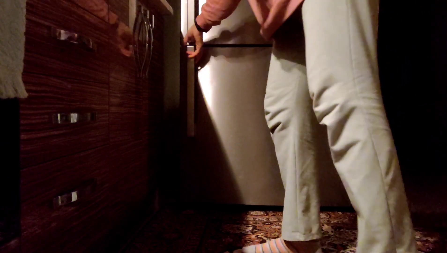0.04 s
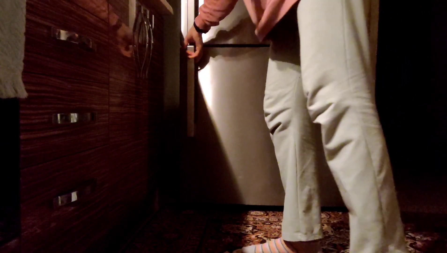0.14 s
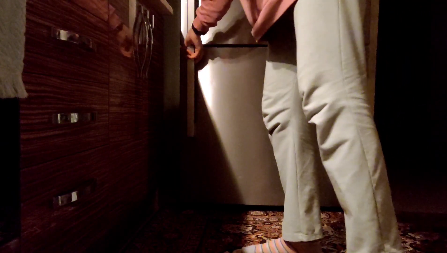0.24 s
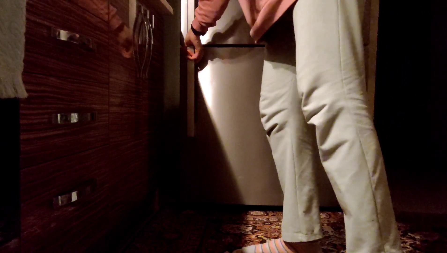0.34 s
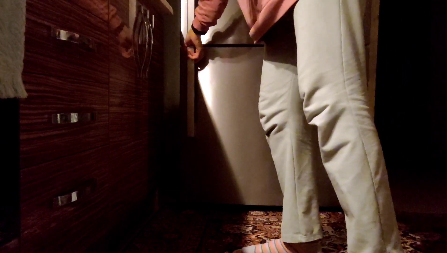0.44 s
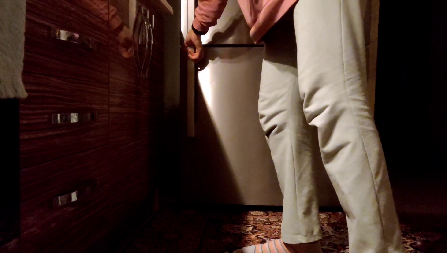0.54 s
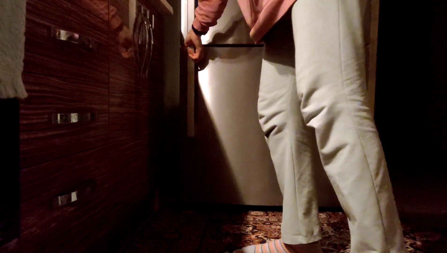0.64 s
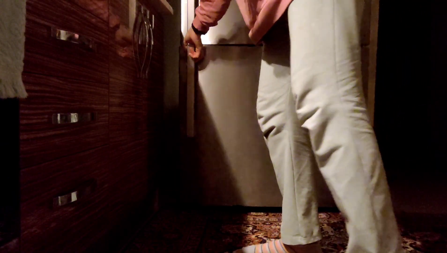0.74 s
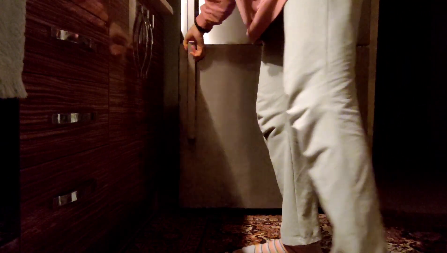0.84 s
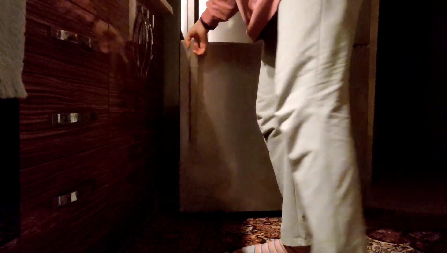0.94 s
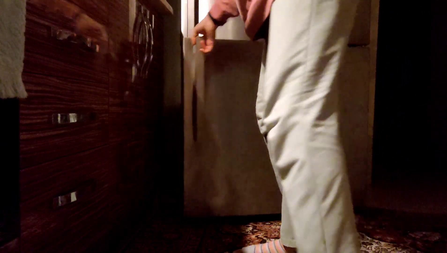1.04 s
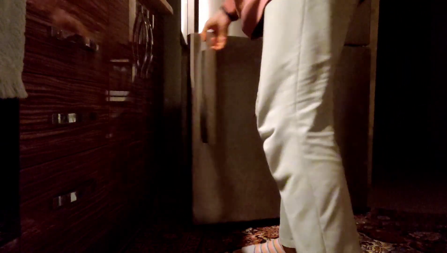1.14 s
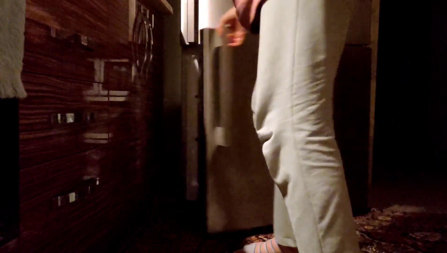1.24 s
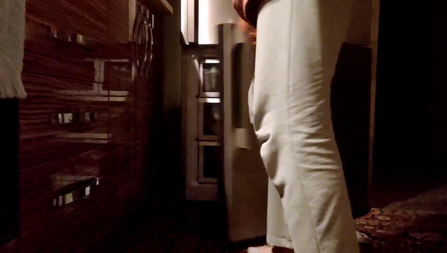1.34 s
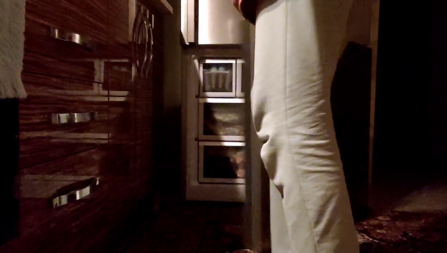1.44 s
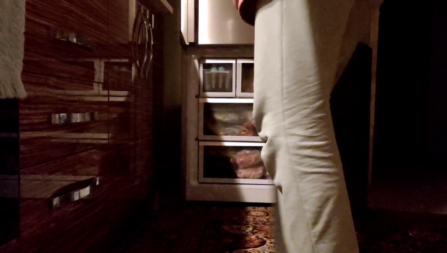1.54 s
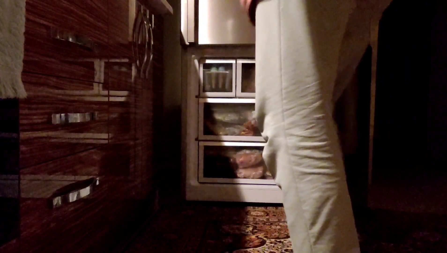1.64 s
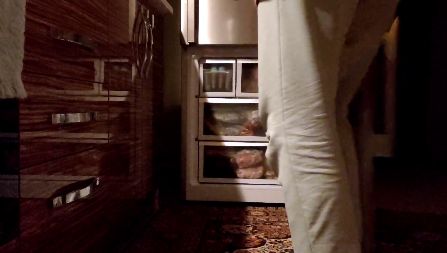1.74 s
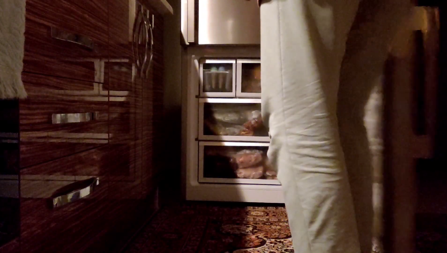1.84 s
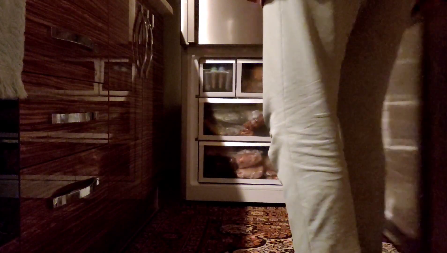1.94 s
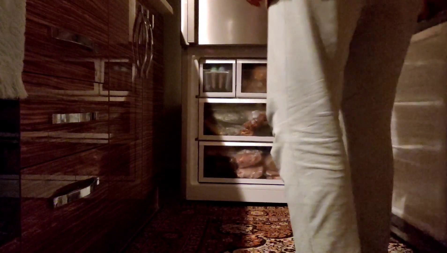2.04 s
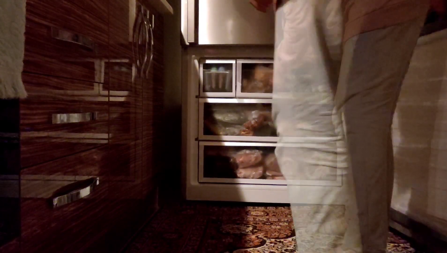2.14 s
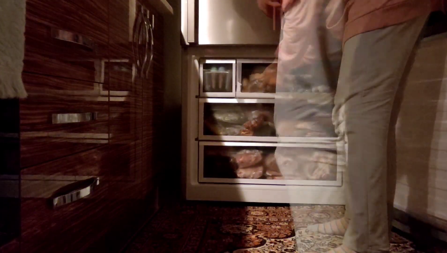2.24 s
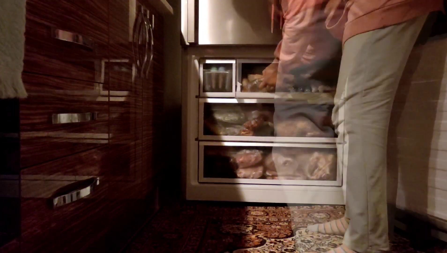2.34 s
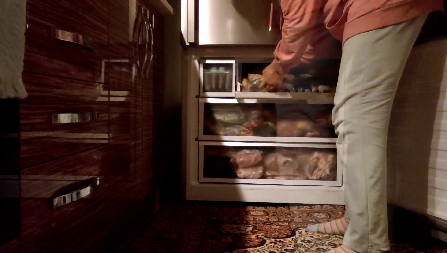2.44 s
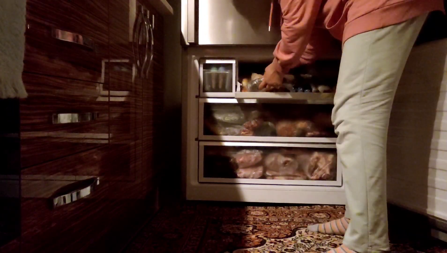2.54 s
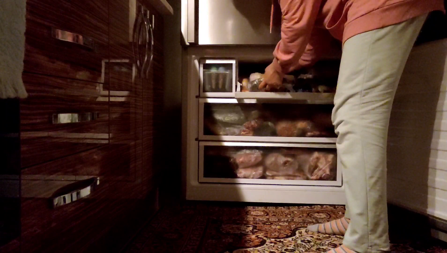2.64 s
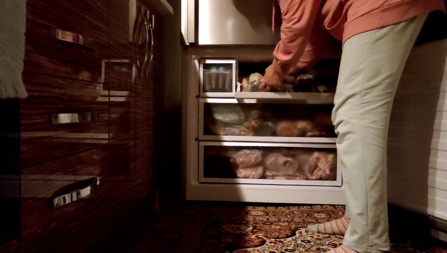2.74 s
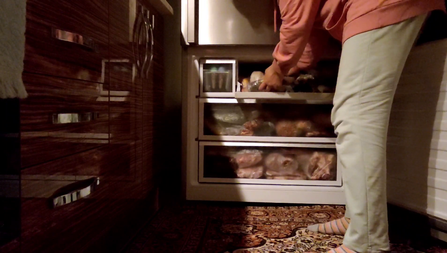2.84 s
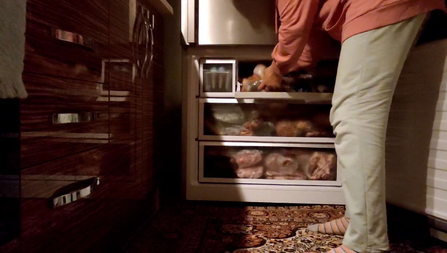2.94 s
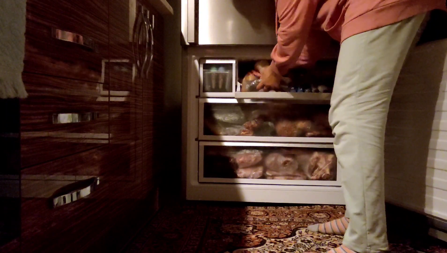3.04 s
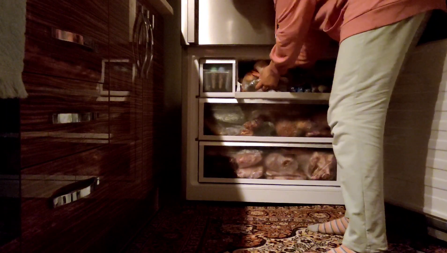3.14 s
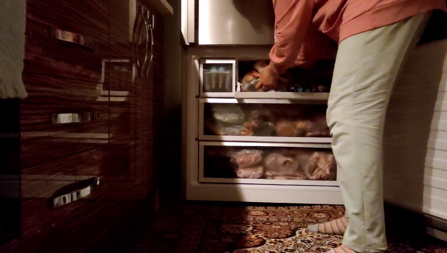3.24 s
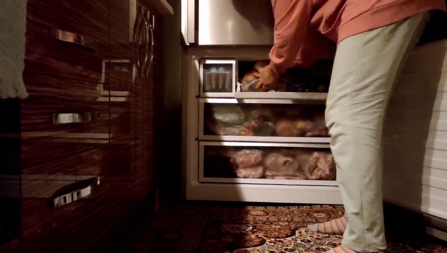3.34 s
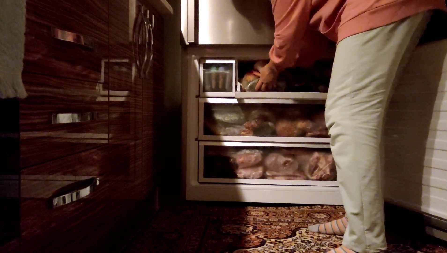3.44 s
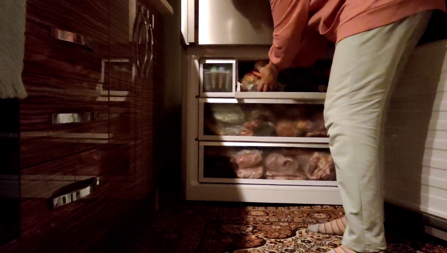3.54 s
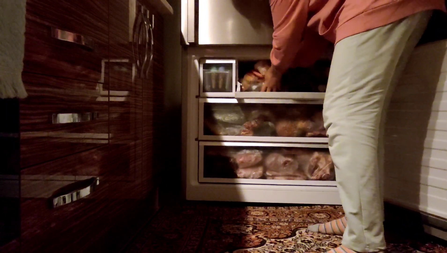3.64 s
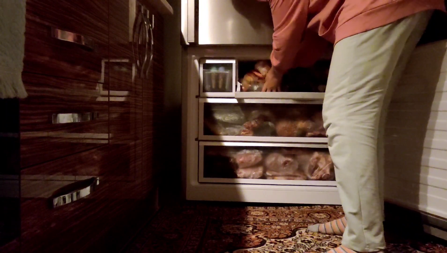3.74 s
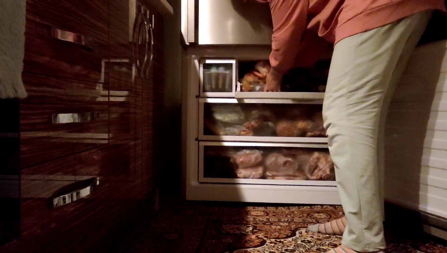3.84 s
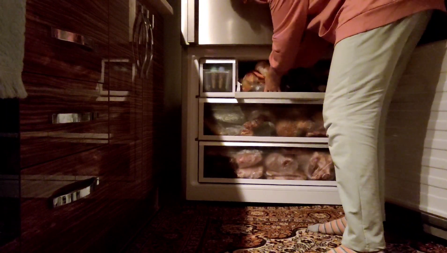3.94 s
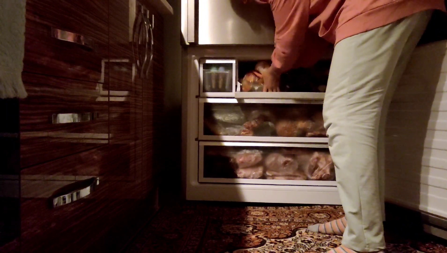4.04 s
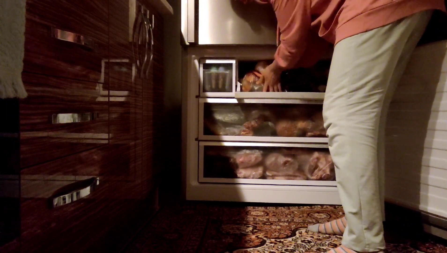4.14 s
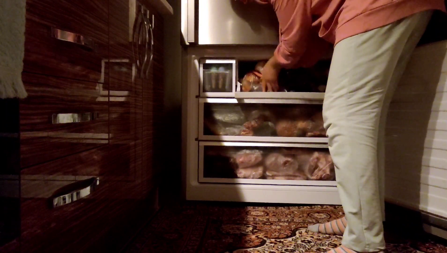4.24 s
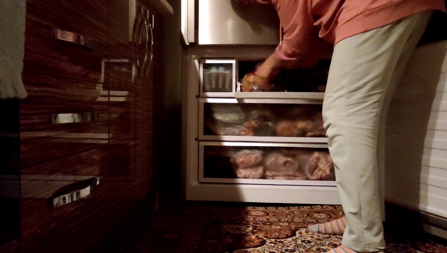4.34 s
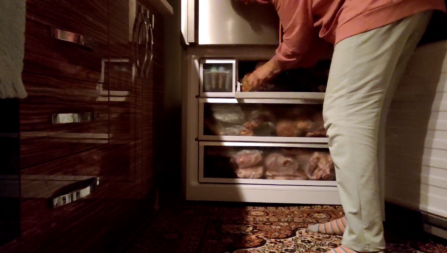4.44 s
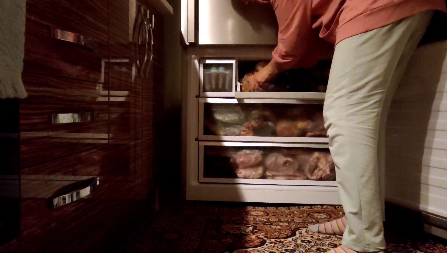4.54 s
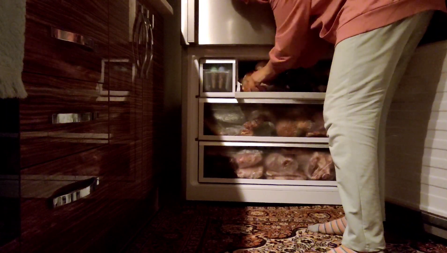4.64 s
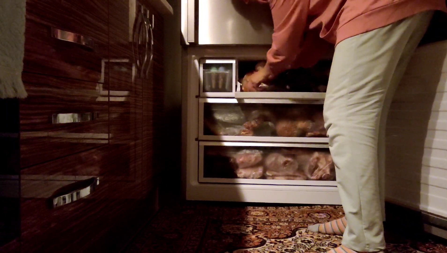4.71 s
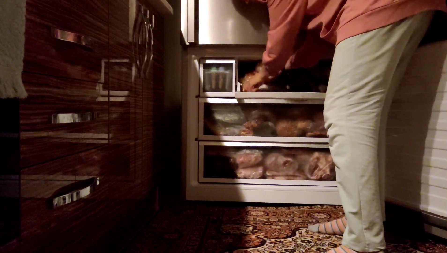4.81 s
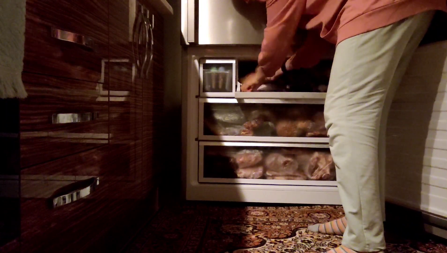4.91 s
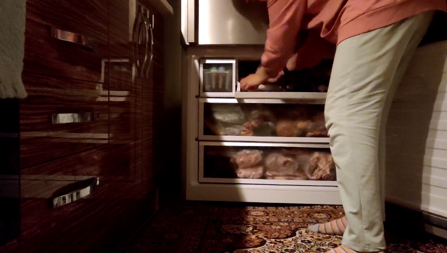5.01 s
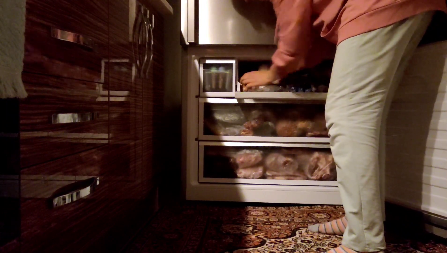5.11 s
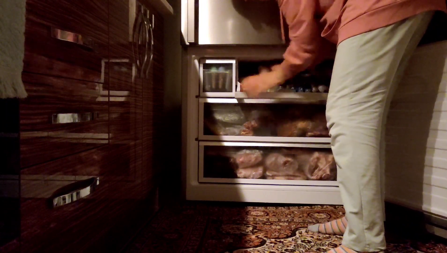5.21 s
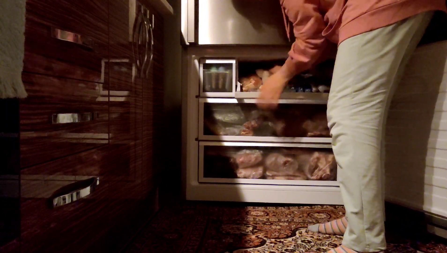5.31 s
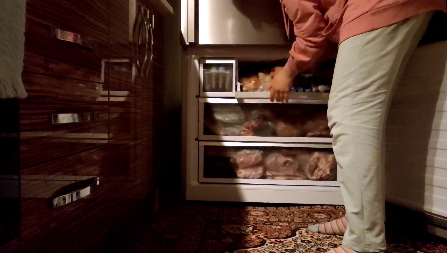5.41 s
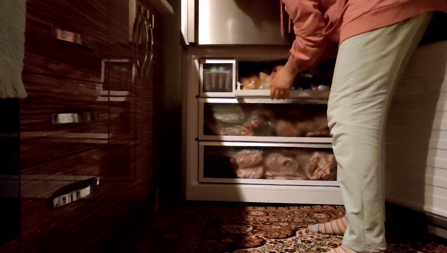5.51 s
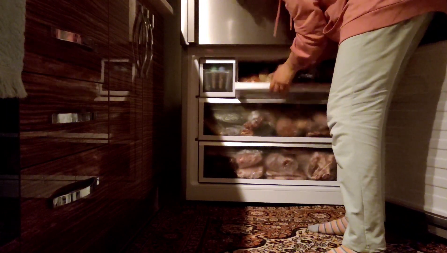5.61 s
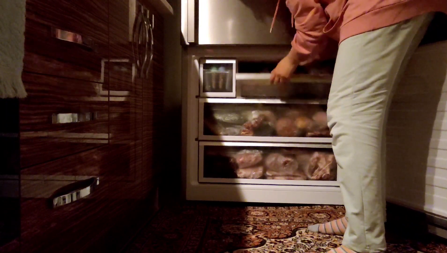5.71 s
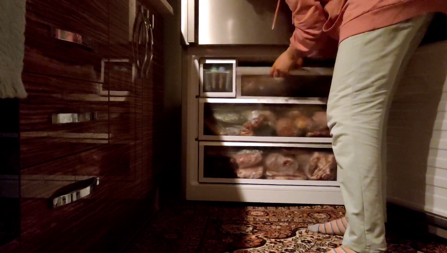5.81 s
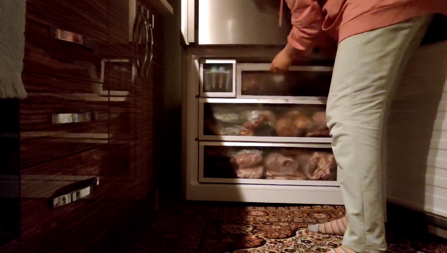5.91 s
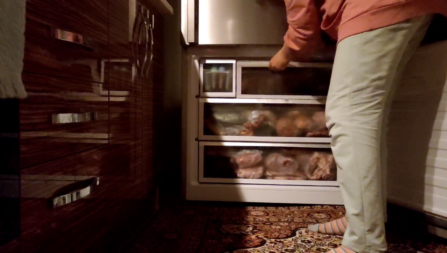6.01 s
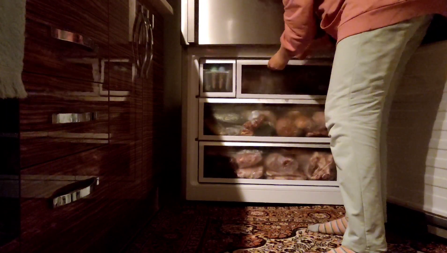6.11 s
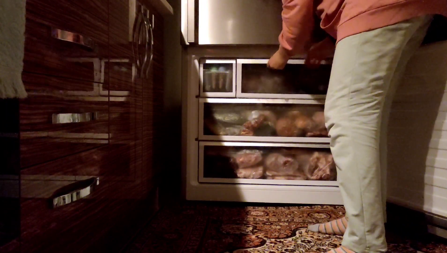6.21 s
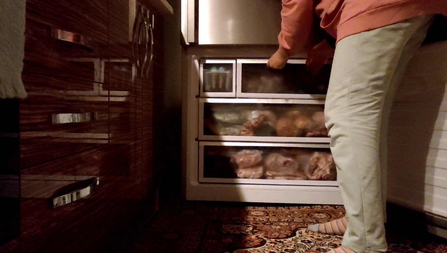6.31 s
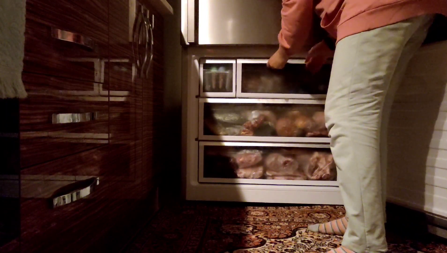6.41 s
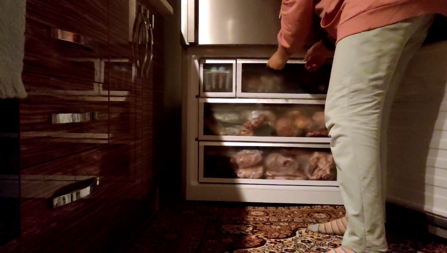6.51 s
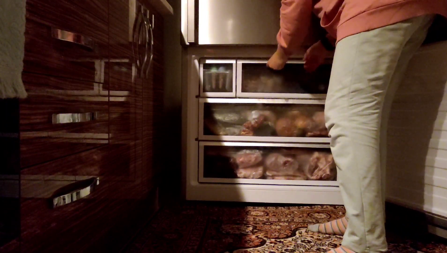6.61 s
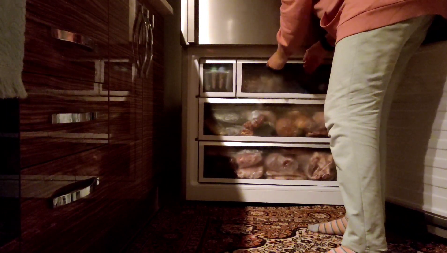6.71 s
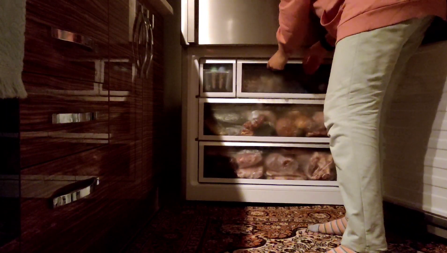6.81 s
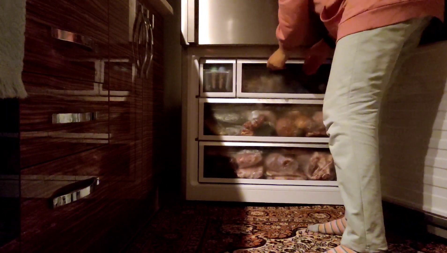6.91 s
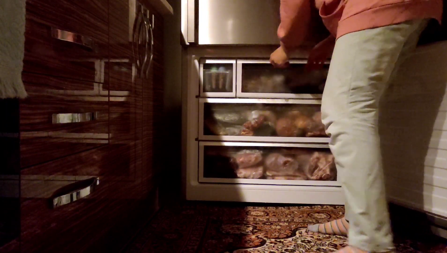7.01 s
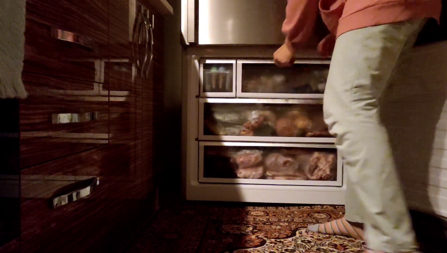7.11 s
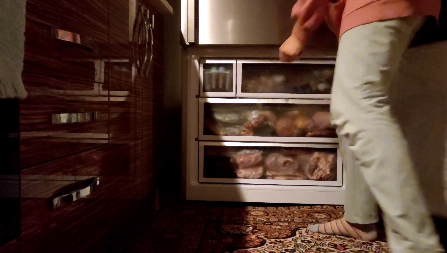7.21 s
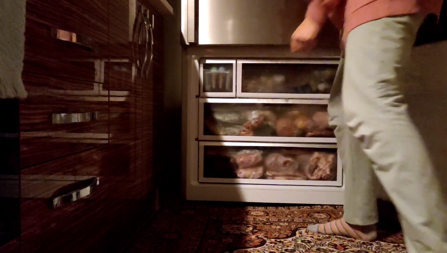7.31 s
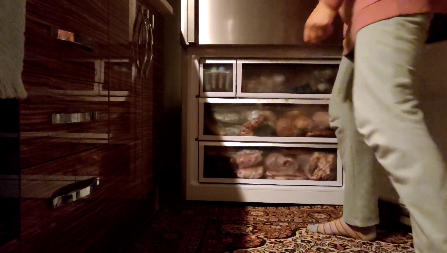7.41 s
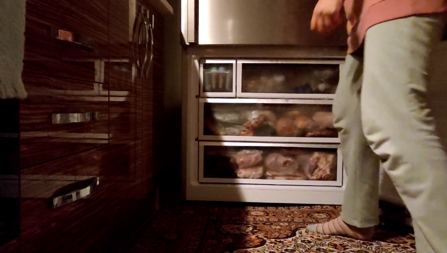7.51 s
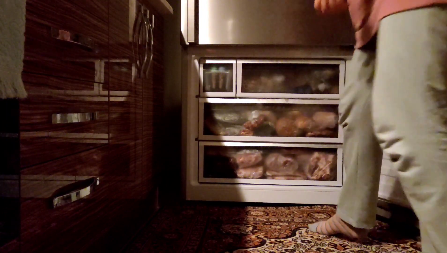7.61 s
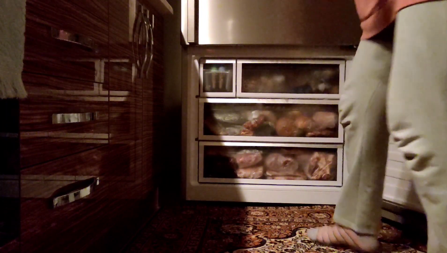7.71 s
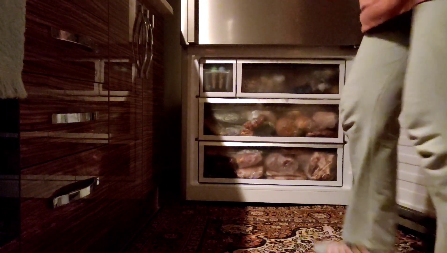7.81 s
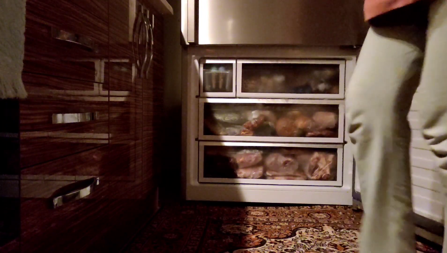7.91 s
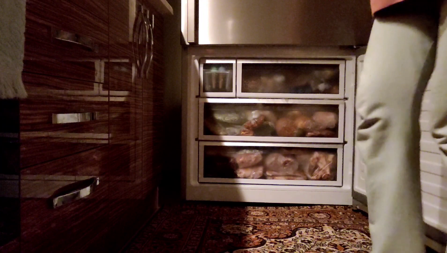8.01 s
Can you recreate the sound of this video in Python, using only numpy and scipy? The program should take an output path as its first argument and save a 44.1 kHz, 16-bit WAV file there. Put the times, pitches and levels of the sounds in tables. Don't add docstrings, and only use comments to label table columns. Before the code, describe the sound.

A sleeve rustles and a freezer door cracks open, then a hand noisily rummages frozen food in crackling bags before the drawer thuds shut.

```python
import sys
import numpy as np
from scipy import signal
from scipy.fft import rfft, irfft, next_fast_len
from scipy.io import wavfile
from scipy.ndimage import uniform_filter1d

SR = 44100
rng = np.random.default_rng(int(sys.argv[2]) if len(sys.argv) > 2 else 0)


def gain_from_db(level_db):
    decades = np.asarray(level_db, float) / 20
    return 10 ** decades


def dump(signal):
    limited = np.clip(np.atleast_2d(signal).T, -1, 1)
    pcm = np.round(limited * 32767).astype(np.int16)
    wavfile.write(sys.argv[1], SR, pcm)


N = 355446
T = np.arange(N) / SR
COARSE = T[::64]

# pitch_hz, level_db, t60_s
BODY_MODES = [(62, -2, .12), (80, 0, .25), (120, 0, .18), (146, -3, .14), (160, 1, .3), (194, 0, .2),
              (226, -1, .13)]
# pitch_hz, level_db, t60_s
HOLLOW_MODES = [(300, -2, .1), (368, -1, .14), (402, -1, .12), (506, -2, .1), (540, 0, .16), (598, -1, .16),
                (686, -2, .1), (772, -2, .1), (900, -4, .08), (1120, -4, .06)]


def handling():
    # freq_hz, level_db (per Hz)
    crinkle_colour = [(1500, -10), (2500, -5.5), (4000, -0.5), (6000, -0.5), (8000, 2), (11000, 3),
                      (14000, 4), (16000, -21)]
    # freq_hz, level_db (per Hz)
    scrape_colour = [(210, 4), (350, 1.5), (479, -36), (534, 3.5), (663, -0.5), (779, -3), (924, 0.5),
                     (1020, -13.5), (1460, 0), (1660, -7.5), (2110, -2.5), (2270, -9), (3000, -12),
                     (3900, -9), (6600, -120)]
    creases = clicks(6000, 1.2) * flutter(40, 0.65)
    crinkle = shape(creases, lambda f: gain_from_db(read(crinkle_colour, f)))
    grains = clicks(2500, 2.5) * flutter(30, 2.2)
    scrape = shape(grains, lambda f: gain_from_db(read(scrape_colour, f)))
    bumps = np.diff(clicks(150, 2.45), prepend=0)
    drum = ring(bumps, nearest(BODY_MODES + HOLLOW_MODES[:3], 144, 23.5))
    return np.array([crinkle * gain_from_db(-5.0), scrape * gain_from_db(1.5), drum / drum.std() * gain_from_db(-6.5)])


def effort_at_door():
    # time_s, level_db
    pull = [
        (0.0, -61),
        (0.46, -64.5),
        (0.56, -84),
        (0.64, -60),
        (0.9, -76),
        (1.04, -75),
        (1.22, -69),
        (1.46, -71.5),
        (2.06, -72.5),
    ]
    return effort(pull)


def effort_in_bags():
    # time_s, level_db
    rummage = [(2.08, -39), (2.86, -38), (3.29, -45.5), (3.39, -42), (3.83, -38.5), (3.86, -45),
               (4.48, -46), (4.58, -69), (4.66, -48), (4.73, -41.5), (5.25, -40), (5.8, -41.5), (5.94, -49),
               (6.07, -58), (6.27, -65), (6.86, -69), (7.36, -63), (8.06, -62.5)]
    return effort(rummage)


def effort(curve):
    # peak_s, change_db, half_length_s
    grips = [(8.04, 7, 0.086), (4.17, 0, .02), (0.363, 13.5, 0.053), (1.327, 7, 0.065), (7.215, 6, .06),
             (7.75, 5.5, 0.051), (1.543, 17.5, 0.1), (1.634, 13, 0.024), (2.392, 7, 0.09),
             (2.538, -10, 0.031), (2.59, 1.5, 0.044), (2.907, -6.5, 0.057), (3.053, 9, 0.085),
             (3.149, 10.5, 0.1), (4.115, 5.5, 0.029), (4.2, -3.5, 0.091), (4.362, 9, 0.036),
             (5.09, 1.5, 0.062), (5.354, 4.5, 0.063), (5.525, 4, 0.081), (5.624, -3.5, 0.058),
             (5.758, 5.5, 0.047), (5.828, -4, 0.051), (7.014, 6.5, 0.08), (7.69, 2.5, 0.087)]
    # peak_s, scrape_db, drum_db, fall_s
    shoves = [(.19, -88, -40, 0.01), (.46, -51, -77, 0.03), (.56, -58, -53, 0.0243), (.76, -69, -48, .1),
              (1.04, -75, -50.5, 0.28), (1.46, -63, -49, 0.1), (1.54, -107, -78, 0.19),
              (2.38, -62, -54, 0.05), (2.5, -75, -49, -0.26), (2.63, -48, -40, 0.03), (2.65, -70, -35, 0),
              (2.86, -59, -46, 0), (3.06, -55, -58, .08), (3.14, -50, -58, 0.03), (3.19, -69, -41.5, 0.15),
              (3.8, -62, -57, 0.19), (4.15, -78, -47.5, 0.07), (4.3, -62, -56, 0), (4.37, -58, -62, 0.03),
              (4.66, -48, -32, -0.06), (4.89, -55, -46, 0.0939), (5.09, -69, -49, 0.02),
              (5.37, -57, -74, 0), (5.65, -82, -46, -0.07), (5.77, -56.5, -48, 0.1155),
              (5.84, -74, -48, 0.05), (6.33, -64.5, -56, 0.25), (6.75, -76, -46, 0.2),
              (7.02, -90, -49.5, 0.08), (7.66, -72.5, -59, 0.26)]
    db = np.interp(COARSE, *np.transpose(curve))
    for s, change_db, half_s in grips:
        db = db + change_db * np.maximum(1 - np.abs(COARSE - s) / half_s, 0)
    db = np.interp(T, COARSE, db)
    above_db = db + 40
    scrape = gain_from_db(-61 + 0.64 * above_db) + swells(shoves, column=1)
    drum = gain_from_db(-59.5 + 0.74 * above_db) + swells(shoves, column=2)
    return np.array([gain_from_db(db), scrape, drum])


def sharp_cracks():
    # (near 4.5 kHz, relative)
    sharpest = [
        (0.4025, -23, -32, -25),
        (0.4534, -13, -11, -15),
        (0.4589, -19.5, -19, -19),
        (3.8187, -16.5, -28, -21),
    ]
    # start_s, level_db, low_db, mid_db
    film = [
        (5.8456, -22.5, -34, -34),
        (5.8495, -19, -27, -37),
        (5.855, -36, -30, -28),
        (5.9655, -23.5, -32, -20),
        (5.9685, -20.5, -45, -19),
        (5.974, -24, -22, -19),
        (6.0797, -31.5, -18, -9),
        (6.083, -34.5, -21, -8),
    ]
    chatter_s = .0016
    return snaps(sharpest, chatter_s) + snaps(film, chatter_s, tilt_db=3.5)


def door_bag_and_drawer_snaps():
    # (near 4.5 kHz, relative)
    door = [(0.3595, -42, -38, -28), (0.399, -27, -23.5, -23), (0.415, -40, -28, -17),
            (0.431, -36, -25, -15), (0.637, -46, -36, -14), (0.7184, -47.5, 1, -14), (0.728, -43, -9, -10),
            (0.771, -44, -29, -9), (0.9154, -53, -15, 8.5), (1.0964, -53, -20, -30),
            (1.452, -49.5, 5.5, -1)]
    # start_s, level_db, low_db, mid_db
    bags = [(2.3554, -25, -20, -33), (2.621, -27.5, -12, -8), (2.673, -32.5, -3, 0),
            (3.1364, -20, -31, -39), (3.7747, -26, -14, -14), (4.09, -27.5, -37, -16),
            (4.343, -31.5, -36, -13), (4.6344, -37, -22, -9), (2.2519, -44, -30, -20),
            (2.5747, -34, -30, -16), (5.7325, -26, -31, -31)]
    # start_s, level_db, low_db, mid_db
    runners = [(6.2297, -44.5, -26, -19), (6.285, -51, 7, -4), (6.313, -45, -8, -24), (6.335, -42, 3, -12),
               (6.345, -49, -1, -14), (6.3734, -39, 2.5, -4), (6.385, -45, 0, -6), (6.405, -54, -8, -13),
               (6.6117, -22, -3.5, -8.5), (6.6294, -30, -12, -12), (6.939, -52, -26, -17),
               (6.981, -45.5, -19, -19), (7.027, -48, -21, -9), (7.621, -36, -27, -42), (7.754, -40, -6, 1)]
    return snaps(door, 0.0046) + snaps(bags, 0.0028) + snaps(runners, 0.0039)


def snaps(rows, chatter_s, tilt_db=0):
    # pitch_hz, level_db, t60_s
    panel = [(1945, 0, .014), (2200, -3, .012)]
    out = np.zeros(N)
    t = T[:SR // 5] - .01
    u = np.maximum(t, 0) / chatter_s
    for s, peak_db, low_db, mid_db in rows:
        burst = rng.standard_normal(len(t)) * (1 - np.exp(-6.0 * u)) * np.exp(-u)
        colour = [(500, low_db - 41), (1100, low_db + 14.5), (2000, low_db + 14.0), (4500, mid_db + 16.0),
                  (8000, 0.43 - tilt_db), (11000, tilt_db / 2), (14000, 0.33)]
        crack = shape(burst, lambda f: gain_from_db(read(colour, f)) * (f > 300))
        crack = peak(crack, peak_db + max(0, low_db, mid_db))
        add(out, s + t[0], crack + peak(ring(burst, panel), peak_db + low_db - 6))
    return out


def thumps():
    # start_s, level_db, boom_hz, hollow_db (relative)
    wall = [(0.759, -36, 136, -5.5), (0.913, -28, 185, -3.5), (1.189, -48, 214, -7),
            (1.479, -36.5, 112, -15), (2.439, -36, 189, -7), (2.619, -40, 166, -4), (3.019, -40, 217, -2),
            (3.059, -35, 202, -22), (3.099, -33, 164, -2), (3.784, -36, 169, -2), (4.663, -38.5, 155, -5),
            (5.052, -38.5, 159, -14), (5.298, -41.5, 150, -21), (5.559, -40, 118, -3.5),
            (5.717, -40.5, 160, -15), (5.799, -34, 153, -6), (6.539, -45, 164, -26), (6.615, -22.5, 92, -4),
            (6.637, -26, 152, -12), (6.675, -25, 80, -7.5), (6.805, -36, 143, -23),
            (7.049, -38.5, 148, -18.5), (7.621, -25.5, 127.5, -22)]
    # start_s, level_db, boom_hz, hollow_db (relative)
    tray = [
        (2.355, -37, 193, 1),
        (2.387, -32, 141, -15),
        (2.675, -35, 158, 3),
        (3.136, -24.5, 196, -1),
        (4.199, -42.5, 159, -5),
        (6.329, -35, 180, -4),
        (6.974, -38, 85, -9),
    ]
    # start_s, level_db, boom_hz, hollow_db (relative)
    rim = [
        (0.455, -48, 166, 13),
        (0.718, -37.5, 155, -4.5),
        (1.449, -35.5, 149, -7.5),
        (3.934, -44.5, 146, -20),
        (4.293, -39, 160, -12),
        (4.819, -50.5, 160, -7),
        (5.527, -38.5, 128, -15),
        (6.284, -35, 131, -7.5),
    ]
    out = knocks(wall, 292, 0.0079) + knocks(tray, 513, 0.0083) + knocks(rim, 715, 0.012)
    return signal.lfilter(*signal.butter(2, 65, "high", fs=SR), out)


def knocks(rows, hollow_hz, push_s):
    out, t = np.zeros(N), T[:SR // 3]
    u = t / push_s
    for s, peak_db, boom_hz, hollow_db in rows:
        push = rng.standard_normal(len(t)) * u * np.exp(-u)
        push = signal.lfilter(*signal.butter(3, .75 * boom_hz, "high", fs=SR), push)
        boom_modes = nearest(BODY_MODES, boom_hz, 28.) + [(boom_hz, -2, .05)]
        boom = peak(struck(push, boom_modes), peak_db)
        hollow = struck(np.diff(push, prepend=0), nearest(HOLLOW_MODES, hollow_hz, 14.3))
        add(out, s - .004, boom + peak(hollow, peak_db + hollow_db))
    return out


def rings():
    # start_s, level_db, pitch_hz, t60_s
    taps = [(.454, -18, 1945, .035), (.4542, -26, 1500, .015), (.4545, -24, 2200, .025),
            (.457, -36, 740, .06), (.74, -42, 66, .3), (.92, -38, 70, .3), (.95, -41, 405, .15),
            (.925, -38, 506, .2), (2.68, -29, 160, .25), (3.04, -35, 170, .25), (3.085, -36, 250, .15),
            (3.14, -25, 540, .24), (3.143, -29, 598, .22), (3.141, -30, 700, .12), (3.142, -31, 194, .2),
            (3.165, -33, 366, .2), (3.162, -31, 640, .07), (3.141, -37, 1500, .04), (3.155, -38, 2100, .03),
            (5.556, -33, 1500, .04), (5.77, -38, 1300, .05), (1.452, -42, 620, .06),
            (1.455, -45, 1000, .05), (.918, -34, 280, .1), (6.376, -42, 1700, .04), (6.614, -34, 1150, .07),
            (6.613, -35, 2000, .04), (6.615, -31, 290, .2), (6.62, -36, 597, .12), (6.634, -25, 100, .07),
            (6.622, -27, 130, .05), (6.655, -36, 580, .1), (6.697, -29, 110, .06), (6.81, -35, 150, .12),
            (7.64, -38, 322, .5), (7.622, -41, 500, .1), (7.64, -41, 430, .08), (7.628, -39, 270, .08),
            (7.628, -48, 810, .08), (7.66, -44, 235, .15), (7.624, -33, 124, .13), (7.052, -44, 160, .5)]
    out, t = np.zeros(N), T[:SR // 3]
    for s, peak_db, hz, t60 in taps:
        tone = struck(np.exp(-t / .0002), [(hz, peak_db, t60)])
        add(out, s, signal.lfilter(*signal.butter(2, hz / 2, "high", fs=SR), tone))
    return out


def kitchen(dry, responses, move_s=.03):
    k, count = int(move_s * SR), responses.shape[1]
    spot = np.repeat(rng.integers(0, count, len(dry) // k + 1), k)[:len(dry)]
    share = uniform_filter1d(1. * (spot == np.arange(count)[:, None]), k // 2, axis=1)
    size = next_fast_len(len(dry) + responses.shape[2])
    spectrum = np.sum(rfft(dry * share, size) * rfft(responses, size), axis=1)
    return irfft(spectrum, size)[:, :len(dry)]


def echoes(count, onset_s=0.00022):
    # freq_hz, t60_s
    echo_t60 = [(100, 0.17), (400, 0.46), (1600, 0.3), (6400, 0.29), (14000, 0.15)]
    # freq_hz, level_db
    wet = [(60, -4.5), (200, -4), (600, 0), (1500, 3), (6000, 5.5), (15000, 1.5)]
    t = T[:SR // 2]
    tail = np.zeros((2, count, len(t)))
    for hz in 45 * 2. ** np.arange(9):
        noise = rng.standard_normal(tail.shape)
        band = shape(noise, lambda f: np.exp(-2 * np.log2(np.maximum(f, 1) / hz) ** 2))
        fade = np.exp(-np.log(1000) * t / read(echo_t60, hz)) * (1 - np.exp(-t / onset_s))
        tail += band * fade * gain_from_db(read(wet, hz)) * np.sqrt(hz / np.sum(fade ** 2) / (SR / 2))
    tail = spread(*tail)
    for port in tail:
        port[np.arange(count), rng.integers(0, 12, count)] += 1
    return tail * gain_from_db(-4.0)


def still_air():
    # freq_hz, level_db (per Hz)
    hush_colour = [(30, 6), (55, -3.5), (125, -0.5), (250, -10), (500, -14.5), (1000, -17.5), (2500, -22.5),
                   (6000, -21.5), (10000, -48), (15000, -22)]
    # pitch_hz, level_db
    compressor = [(1410, -89)]
    # peak_s, level_db, fall_s
    wafts = [(.28, -33.5, 0.2), (.72, -41, 0.22), (1.19, -44, 0.1), (1.59, -46, 0.1), (2.04, -48, 0.099),
             (2.45, -42.5, 0.44), (3.3, -53, 0.16), (3.84, -53, 0.22), (4.3, -47, 0.19), (5.23, -49, 0.17),
             (5.8, -57, 0.25), (6.5, -51, 0.94), (7.74, -41, 0.13)]
    hush = spread(*shape(rng.standard_normal((2, N)), lambda f: gain_from_db(read(hush_colour, f)) * (f > 25)))
    whine = sum(gain_from_db(db) * np.sqrt(2) * np.sin(2 * np.pi * hz * T) for hz, db in compressor)
    draught = spread(*shape(rng.standard_normal((2, N)), lambda f: (f / 9) / (1 + (f / 9) ** 3.36)))
    draught = draught * (gain_from_db(-53) + swells(wafts, column=1)) * gain_from_db(-8.0)
    return hush * gain_from_db(-63.5) + whine + draught


def clicks(per_s, scatter_db):
    u, sign, size = rng.random(N), rng.standard_normal(N), rng.exponential(size=N)
    return (u < per_s / SR) * np.sign(sign) * gain_from_db(scatter_db * np.minimum(size, np.pi))


def flutter(per_s, depth_db):
    k = int(SR / per_s)
    steps = np.repeat(rng.standard_normal(N // 100), k)[:N]
    return gain_from_db(depth_db * uniform_filter1d(steps, k))


def swells(rows, column):
    gain = 0
    for row in rows:
        fall_s = max(row[-1], .005)
        gain = gain + gain_from_db(row[column] - 12 * np.abs(COARSE - row[0]) / fall_s)
    return np.interp(T, COARSE, gain)


def ring(x, modes):
    out = 0
    for hz, db, t60 in modes:
        pole = np.exp((2j * np.pi * hz - np.log(1000) / t60) / SR)
        out = out + gain_from_db(db) * signal.lfilter([1], [1, -pole], x).imag
    return out


def struck(push, modes):
    return sum(peak(ring(push, [mode]), mode[1]) for mode in modes)


def nearest(modes, hz, db_per_octave):
    return [(f, db - db_per_octave * abs(np.log2(f / hz)), t60) for f, db, t60 in modes]


def read(table, hz):
    f, v = np.transpose(table)
    return np.interp(np.log(np.maximum(hz, 1)), np.log(f), v)


def shape(x, gain):
    y = irfft(rfft(x) * gain(np.fft.rfftfreq(x.shape[-1], 1 / SR)), x.shape[-1])
    return y / np.sqrt(np.mean(y ** 2))


def spread(mid, side):
    # freq_hz, likeness (0-1)
    likeness = [(30, 0), (70, 0.99), (180, 0.73), (300, 0.55), (640, 0.18), (1400, 0), (3000, 0.019),
                (15000, .0)]
    n = mid.shape[-1]
    like = read(likeness, np.fft.rfftfreq(n, 1 / SR))
    m = rfft(mid) * np.sqrt((1 + like) / 2)
    s = rfft(side) * np.sqrt((1 - like) / 2)
    return irfft(np.array([m + s, m - s]), n)


def peak(x, db):
    return x * gain_from_db(db) / np.max(np.abs(x))


def add(track, s, x):
    i = int(s * SR)
    track[i:i + len(x)] += (x * np.cos(np.linspace(0, np.pi / 2, len(x))))[:N - i]


def scene():
    sharp, cracks = sharp_cracks(), door_bag_and_drawer_snaps()
    layers, responses = handling(), echoes(count=8)
    hits = sharp + cracks + thumps()
    tones = rings()
    early = np.sum(layers * effort_at_door(), axis=0) + hits
    late = np.sum(layers * effort_in_bags(), axis=0) + hits
    cut, lead = int(2.0705 * SR), SR // 2
    at_door = kitchen(early[:cut], responses)
    in_bags = kitchen(late[cut - lead:], responses)[:, lead:]
    heard = np.hstack([at_door, in_bags])
    direct = cracks * gain_from_db(-12.0) + sharp * gain_from_db(-10.5) + tones * gain_from_db(-8.0)
    tone_echo = signal.fftconvolve(tones[None], responses[:, 0], axes=1)[:, :N] * gain_from_db(-6.0)
    return heard + direct + tone_echo + still_air()


def top_cut(x):
    return signal.sosfilt(signal.butter(12, 15610, fs=SR, output="sos"), x)


def record(dry):
    # resonance_hz, width_hz, boost_db, overall_db, rolloff_hz
    ports = [
        (10800, 1180, 16, 1.5, 11500),
        (8590, 850, 17.5, 2, 7400),
    ]
    f = np.fft.rfftfreq(N, 1 / SR)
    gains = []
    for hz, width, boost_db, db, roll_hz in ports:
        resonance = 1 / (1 + 1j * (f ** 2 - hz ** 2) / (np.maximum(f, 1) * width))
        gains.append(gain_from_db(db) * (1 + (gain_from_db(boost_db) - 1) * resonance) / (1 + 1j * f / roll_hz))
    top = np.where(f < 14350, 1, gain_from_db(-64))
    mix = irfft(rfft(dry) * np.array(gains) * top, N)
    return top_cut(mix)


dry = scene()
out = record(dry)
dump(out)
```